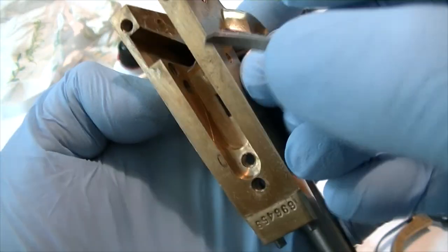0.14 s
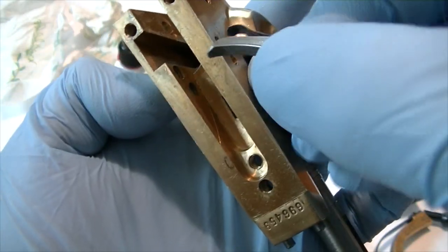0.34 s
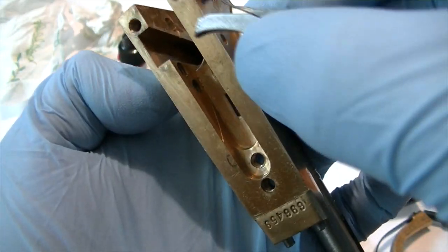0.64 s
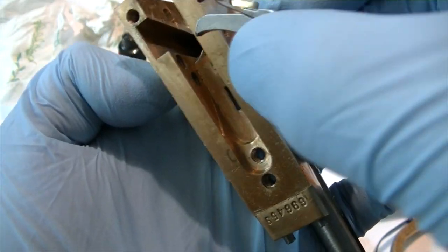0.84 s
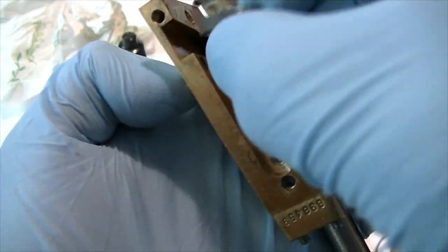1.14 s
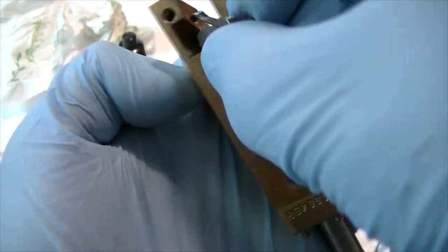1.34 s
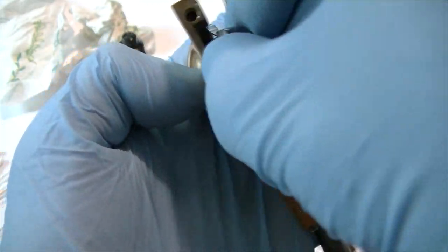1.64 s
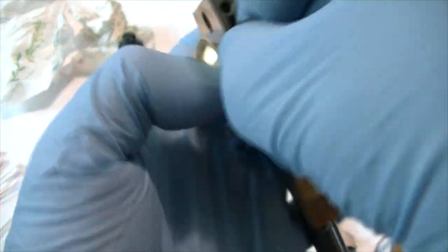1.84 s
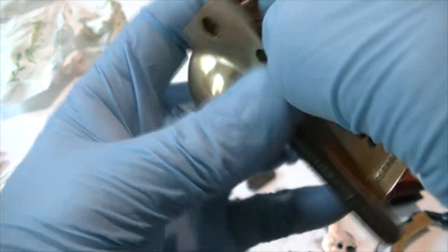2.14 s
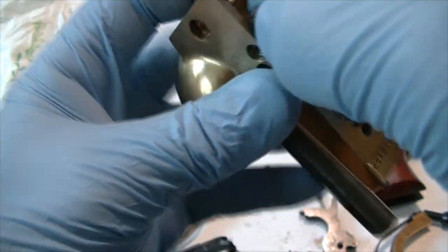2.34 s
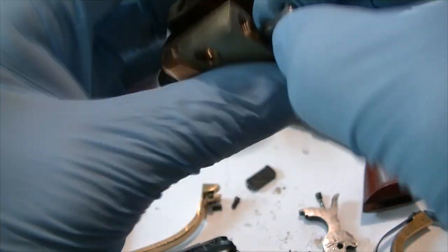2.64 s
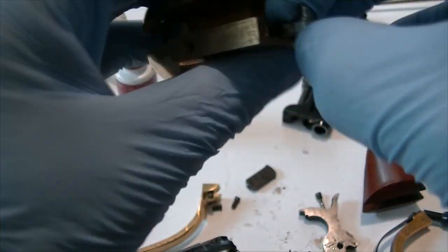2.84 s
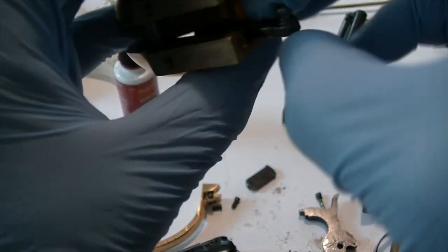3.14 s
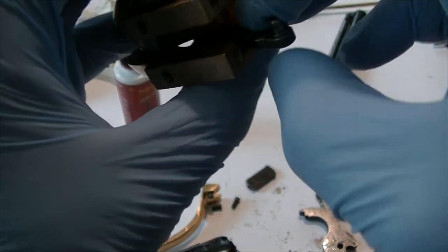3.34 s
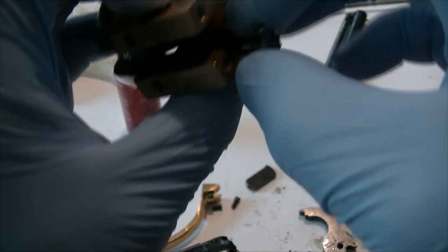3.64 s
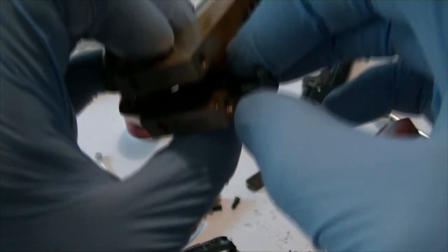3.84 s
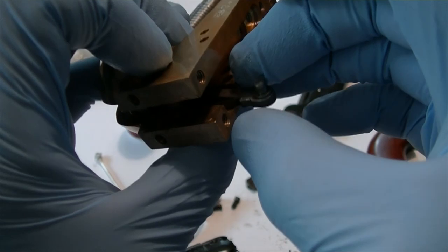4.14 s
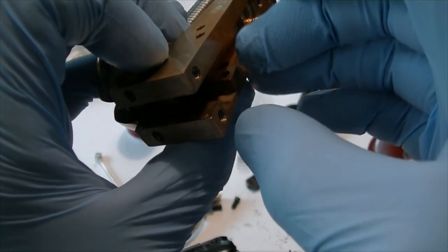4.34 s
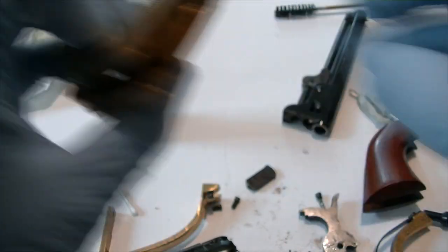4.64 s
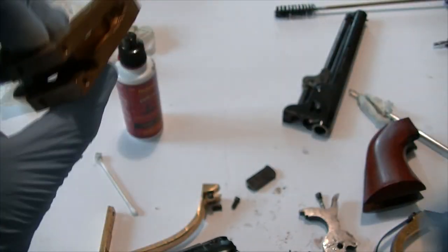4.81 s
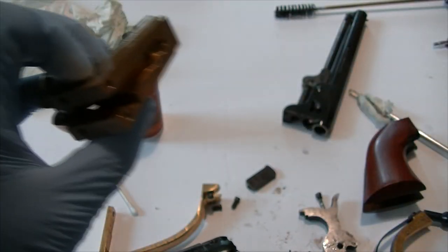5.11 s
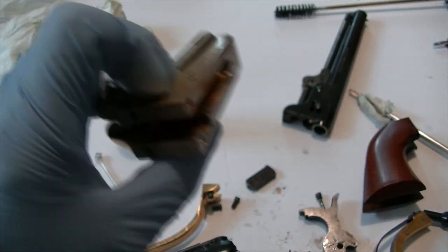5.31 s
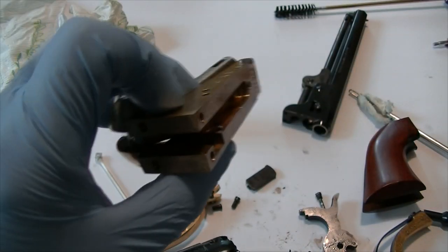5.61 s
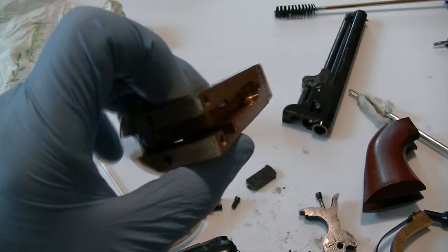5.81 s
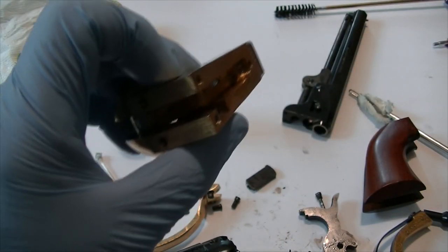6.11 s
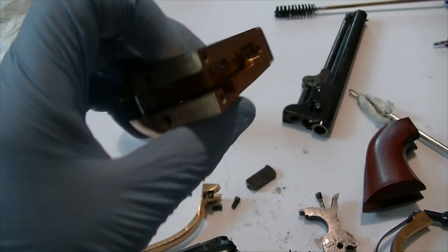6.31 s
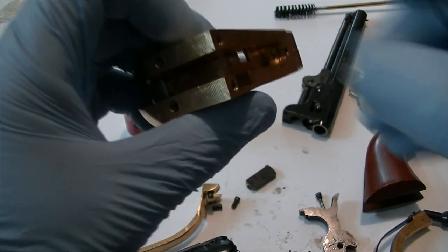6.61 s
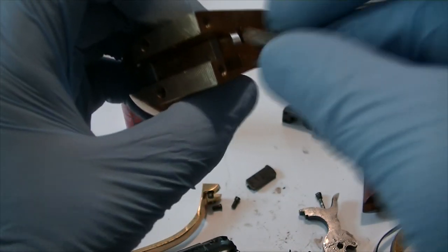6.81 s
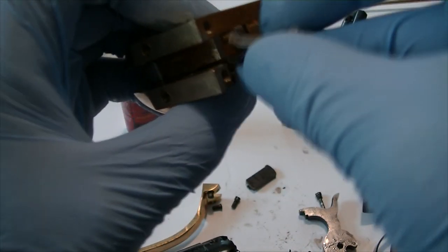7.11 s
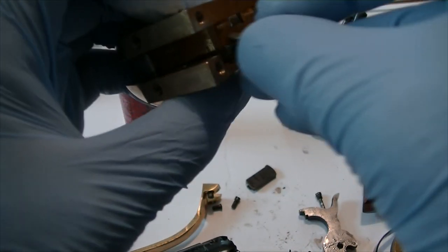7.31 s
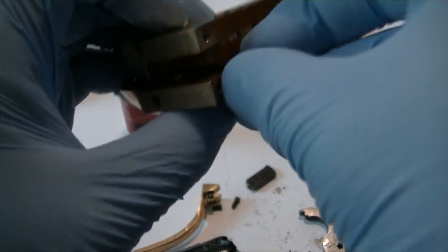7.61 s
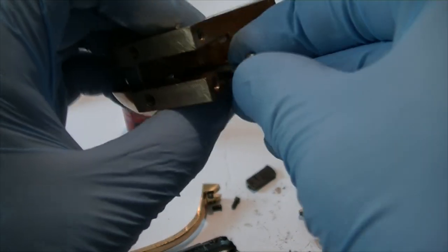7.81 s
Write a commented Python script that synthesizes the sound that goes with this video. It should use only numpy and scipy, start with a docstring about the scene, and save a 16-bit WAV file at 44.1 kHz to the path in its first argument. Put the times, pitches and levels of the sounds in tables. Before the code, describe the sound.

Small metal gun parts are handled right by the microphone: light clicks, short steel pings and scrapes mix with the hiss and creak of rubber gloves. Midway, a dropped tool hits the table with a loud crack, bounces a few times and settles, making the top resonate. More rubbing and ticking follows, ending in soft pings of a spring. A low fan hum fills the small room throughout.

```python
"""Fitting a spring in a revolver frame

A small room with a fan humming. Close to a stereo microphone, gloved hands turn a brass revolver
frame and try a flat steel spring in it. The rubber rubs and creaks, parts tick on the frame, and
the spring rings as it catches and scrapes. Further off, a dropped tool bounces on the table,
sets the top booming and rolls to rest."""
import sys
import numpy as np
from scipy import signal
from scipy.fft import rfft, irfft, next_fast_len
from scipy.io import wavfile

SR = 44100
rng = np.random.default_rng(int(sys.argv[2]) if len(sys.argv) > 2 else 0)


def inscribe(sig):
    """Save sig as 16-bit PCM at rate SR to the path in sys.argv[1].

    A 1-D sig is mono; a 2-D sig holds one channel per row.
    Samples are clipped to [-1, 1] before scaling.
    """
    pcm = np.round(np.clip(np.atleast_2d(sig).T, -1, 1) * 32767)
    wavfile.write(sys.argv[1], SR, pcm.astype(np.int16))


N = 351036


def undb(db):
    """Decibels to gain."""
    return 10 ** (np.asarray(db) / 20)


def unit(x):
    """Scale to rms 1."""
    return x / np.sqrt(np.mean(x ** 2))


def clock(seconds):
    """Sample times over a stretch."""
    return np.arange(int(seconds * SR)) / SR


def decay(t, t60):
    """Exponential fall of 60 dB in t60 seconds."""
    return np.exp(-np.log(1000) * t / t60)


def add(track, start_s, sound):
    """Mix a sound in at a time."""
    i = int(start_s * SR)
    track[i:i + len(sound)] += sound[:N - i]


def lookup(hz, points):
    """Read (freq_hz, value) points on a log-frequency axis."""
    f, value = np.transpose(points)
    return np.interp(np.log(hz + 1), np.log(f), value)


def shape(x, gain):
    """Filter by a gain given as a function of frequency."""
    size = next_fast_len(x.shape[-1], real=True)
    spectrum = rfft(x, size) * gain(np.fft.rfftfreq(size, 1 / SR))
    return irfft(spectrum, size)[..., :x.shape[-1]]


def colour(x, points):
    """Filter by (freq_hz, gain_db) points."""
    return shape(x, lambda f: undb(lookup(f, points)))


def band(x, hz, q):
    """One causal resonance, its q at least 0.7."""
    return signal.lfilter(*signal.iirpeak(min(hz, SR / 3), max(q, .7), fs=SR), x)


def blip(contact, hz, q):
    """A contact heard through one resonance, peak 1."""
    sound = band(contact, hz, q)
    return sound / np.abs(sound).max()


def click(points, tilt_db=0, size=512):
    """Minimum-phase pulse of peak 1 with a given spectrum, tilted about 2 kHz."""
    f = np.fft.rfftfreq(size, 1 / SR)
    spectrum_db = lookup(f, points) + tilt_db * np.log2((f + 200) / 2000)
    cepstrum = irfft(np.log(undb(spectrum_db)))
    cepstrum[1:size // 2] *= 2
    cepstrum[size // 2 + 1:] = 0
    pulse = irfft(np.exp(rfft(cepstrum)))
    return pulse / np.abs(pulse).max()


def ring(modes, tilt_db=0, pivot_hz=2000):
    """Decaying modes after one blow; a harder contact tilts them towards the treble."""
    t = clock(.5)
    return sum(undb(db + tilt_db * np.log2(hz / pivot_hz)) * np.sin(2 * np.pi * hz * t) * decay(t, t60)
               for hz, db, t60 in modes)


def chatter(t60, db):
    """A contact: one pulse, then a fast-dying burst of micro-impacts."""
    t = clock(.05)
    return (t == 0) + undb(db) * rng.standard_normal(len(t)) * decay(t, t60)


def walk(rate_hz):
    """Random wander of rms 1, changing about rate_hz times a second."""
    knots = rng.standard_normal(int(2 * rate_hz * N / SR) + 2)
    return unit(np.interp(np.arange(N) / SR * 2 * rate_hz, np.arange(len(knots)), knots))


def grit(rough_db, size=12):
    """Dense micro-slips whose strength changes every size samples."""
    noise = rng.standard_normal(N)
    strength = undb(rough_db * rng.standard_normal(N // size + 1))
    return unit(noise * np.repeat(strength, size)[:N])


def gesture(length_s, attack_share, release_s):
    """Envelope of one movement: attack, hold, exponential release."""
    t = clock(length_s + .3)
    attack = np.minimum(t / max(attack_share * length_s, 1 / SR), 1)
    return attack * np.exp(-np.maximum(t - length_s, 0) / release_s)


# Fan and mains tones in the background: pitch_hz, level_db
FAN_TONES = [(59, -74), (118.4, -66.5), (211, -66.5), (220.7, -60.5), (238, -67), (296.5, -61),
             (345.5, -56.5), (382.2, -63.5), (433, -64)]
# Air moving through the room: freq_hz, gain_db
AIR_COLOUR = [(25, -25), (58, -15), (90, -9), (120, -7.5), (160, -5), (215, 1), (330, -3), (440, -2.5),
              (540, -11), (800, -13), (1300, -18.5), (2100, -19.5), (3000, -24), (9000, -30),
              (16000, -38.5)]


def fan(air_db=-52, waver=0.31, drift_rad=0.76):
    """Wavering tones over moving air; deep bass and hiss differ between left and right."""
    t, tones = np.arange(N) / SR, np.zeros(N)
    for hz, db in FAN_TONES:
        amplitude = undb(db) * np.sqrt(2) * (1 + waver * walk(3.4))
        tones += amplitude * np.sin(2 * np.pi * hz * t + drift_rad * walk(2.75))
    mid, side = (undb(air_db) * unit(colour(rng.standard_normal(N), AIR_COLOUR)) for _ in range(2))
    side = colour(side, [(50, 2.5), (200, -9), (450, -6), (1500, 0.5), (4000, 0.5), (10000, -0.5)])
    return tones + mid + np.array([side, -side])


# A glove slides over the metal, close to the microphone: start_s, length_s, level_db, brightest_hz
GLOVE_SLIDES = [(0.013, 0.13, -64, 3500), (1.713, .42, -53.5, 1600), (1.831, 0.085, -52.5, 10000),
                (1.99, .12, -54, 8500), (2.176, 0.02, -44, 5500), (2.207, 0.04, -40.5, 5500),
                (2.274, .34, -50.5, 4500), (2.616, 0.17, -57.5, 3500), (2.831, 0.21, -55.5, 7000),
                (3.067, .1, -61.5, 3000), (3.374, .24, -64.5, 3000), (5.336, .07, -57.5, 4000),
                (5.416, 0.085, -43.5, 5000), (5.538, 0.014, -48.5, 5000), (5.552, .21, -55.5, 5500),
                (5.769, 0.078, -42, 5200), (5.937, 0.027, -44, 4200), (5.969, 0.031, -46.5, 4200),
                (6.0, 0.13, -61, 3500), (6.121, .012, -46, 6000), (6.381, .11, -58.5, 3000),
                (6.638, 0.19, -66.5, 10000), (7.073, .13, -57.5, 5000), (7.513, 0.088, -59.5, 2900),
                (7.597, 0.086, -57.5, 9500)]
# Hiss of rubber on metal at close range: freq_hz, gain_db
RUB_COLOUR = [(200, -4.5), (550, 0.5), (850, -1), (1300, 0.5), (2300, -2), (4200, 3), (6500, -3),
              (10000, -3), (13000, -10.5), (16000, -19)]


def glove_rub(grip_db=-66, swell_db=2, rub_db=-3.5, flutter_db=1.76,
              grain_db=-9, bright_db=-2.5, snap_db=-9, snaps_per_s=45):
    """Rubber sticks, snaps free and slips over the metal, each slide brightest in its own band."""
    speed = undb(grip_db + swell_db * walk(0.76))  # the grip never rests
    bright, slips = np.zeros(N), grit(rough_db=3.5)
    for start, length, db, hz in GLOVE_SLIDES:
        push = undb(db) * gesture(length, attack_share=0.32, release_s=0.023)
        add(speed, start, push)
        contact = slips[int(start * SR):][:len(push)]
        add(bright, start, push[:len(contact)] * unit(band(contact, hz, q=3)))
    hiss, side = (unit(colour(grit(rough_db=3.5), RUB_COLOUR)) for _ in range(2))
    grains = undb(grain_db) * unit(band(grit(rough_db=8.5, size=40), hz=2440, q=0.74))
    releases = (rng.random(N) < snaps_per_s / SR) * rng.standard_normal(N)
    snaps = signal.fftconvolve(releases, chatter(t60=0.01, db=-12))[:N]
    grains += undb(snap_db) * unit(band(snaps, hz=3000, q=.8))
    # both hands rub, so the treble differs between left and right
    side = colour(side, [(1000, -17), (3500, -16), (7000, -2), (12000, -4)])
    rub = speed * (hiss + grains + np.array([side, -side])) + undb(bright_db) * bright
    return undb(rub_db + flutter_db * walk(61)) * rub


# Parts and gloves catch on the frame, close up: start_s, level_db, centre_hz, relative_ring_db
FRAME_TICKS = [(.080, -37, 3420, -20), (0.1458, -27, 1980, -41), (.166, -30.5, 2810, -30),
               (0.3128, -34.5, 2630, -11.5), (.470, -27, 2270, -36), (.480, -45, 3000, -7),
               (1.074, -30, 3900, -25), (1.1642, -41.5, 2410, -11.5), (1.983, -34.5, 1780, -32),
               (2.190, -27, 5000, -28), (2.2357, -4.5, 5570, -45), (2.3277, -25, 6500, -25),
               (2.4414, -32.5, 760, -28), (2.4414, -23, 4470, -30), (2.467, -28.5, 3500, -21),
               (2.569, -23, 6500, -30), (3.019, -36.5, 2200, -33), (3.054, -33, 2480, -34),
               (3.102, -30, 10000, -29), (3.227, -34, 4000, -22), (3.933, -38, 2480, -10.5),
               (4.289, -27.5, 9500, -40), (5.101, -39.5, 2390, -13.5), (5.44, -21, 2900, -31),
               (5.978, -19, 3580, -39), (6.126, -28, 5560, -41), (6.486, -39.5, 2400, -9.5),
               (7.020, -43.5, 2400, -9.5)]
# Modes of the brass frame in the hand: pitch_hz, level_db, t60_s
FRAME_MODES = [(1970, -13, 0.041), (2360, -1, 0.05), (2880, -13, 0.036), (3580, 2, 0.035),
               (4660, -4.5, .03), (5200, -0.5, 0.025)]


def frame_ticks(q=1.55, thud_db=-27, spot_db=5):
    """Each catch ticks, thuds and rings the frame, which the gripping hand soon damps."""
    out = np.zeros(N)
    for start, db, hz, ring_db in FRAME_TICKS:
        # each spot on the frame favours other modes
        modes = [(f, mode_db + spot_db * rng.uniform(-1.1, 1), t60) for f, mode_db, t60 in FRAME_MODES]
        add(out, start, undb(db) * blip(chatter(t60=0.011, db=-18), hz, q))
        add(out, start, undb(db + thud_db) * ring([(300, 0, 0.018)]))
        add(out, start, undb(db + ring_db) * ring(modes))
    return colour(out, [(100, 0), (1000, 7.5), (4000, -0.5), (8000, 1), (16000, -2.5)])


# Close to the microphone, the steel spring clinks lightly (first two rows), then glove rubber lets go: start_s,
# level_db, centre_hz
CHIRPS = [(1.384, -44, 3470), (1.392, -42, 3450), (1.417, -44, 2600), (1.558, -45.5, 2900),
          (2.137, -37, 2780), (2.348, -33, 3350), (2.358, -34, 3210), (2.369, -33, 3400),
          (2.566, -32.5, 3020), (3.360, -43.5, 2500), (5.358, -43, 2960), (5.876, -40.5, 3100),
          (6.442, -42.5, 2200), (7.593, -43, 2930)]


def chirps(q=2.9, faint_db=-53, spread_db=3, faint_count=36):
    """Each release of the rubber, like the spring's light clink, is a short, soft-edged chirp; faint ones come
    at random."""
    out = np.zeros(N)
    faint = [(when * N / SR, faint_db + spread_db * (2 * size - 1), 2200 + 1200 * pitch)
             for when, size, pitch in rng.random((faint_count, 3))]
    for start, db, hz in CHIRPS + faint:
        release = band(chatter(t60=0.027, db=-12), hz, q)
        add(out, start, undb(db) * blip(release, hz, q))
    return out


# Modes of the flat steel spring between the fingers: pitch_hz, level_db, t60_s
SPRING_MODES = [(3143, -16, 0.086), (3520, -16.5, 0.081), (4343, -1, 0.07), (4417, -12.5, 0.047),
                (5000, -16, 0.054), (6560, -13.5, 0.048), (7100, -26, .08), (9760, -8.5, 0.025),
                (10400, -34, .08)]


def held_spring(tilt_db, damping, tune=1):
    """The steel rings; finger pressure damps and detunes it."""
    modes = [(hz * tune, db, t60 / damping) for hz, db, t60 in SPRING_MODES]
    return ring(modes, tilt_db, pivot_hz=4400)


# The spring catches, close up: start_s, level_db, tilt_db_per_octave, rise_ms, damping_factor
SPRING_PINGS = [(1.4294, -35.5, 11.5, 0.36, 0.56), (2.890, -34.5, 4.5, 1.7, 1.2),
                (3.408, -40.5, 1, 1.3, 1.7), (4.150, -37, -4, 1.3, 3.7), (4.173, -23, -7, 4.4, 1.13),
                (4.265, -37.5, 6, .4, 0.88), (7.197, -42.5, -9, 1.8, 0.77),
                (7.375, -35.5, -5.5, 0.44, 0.86), (7.612, -32, -13, 1.5, 1.5),
                (7.913, -32.5, -13, 1.5, 1.26)]
# It slides on the frame, as close: start_s, length_s, level_db, tilt_db_per_octave, damping_factor
SPRING_SCRAPES = [(1.626, 0.076, -60, 10, 2), (1.675, 0.1, -52.5, 8, 6), (2.048, 0.077, -50.5, 5, 5.2),
                  (2.383, 0.031, -42.5, -1, 2.5), (2.415, .018, -43.5, 0, 1.7), (4.14, 0.025, -53, -5, 1.9),
                  (4.205, 0.074, -59.5, 0, 3.7), (7.29, 0.068, -55.5, -2, 0.88),
                  (7.406, 0.064, -53.5, -2, 3.2), (7.604, 0.022, -45.5, 3, 5.4), (7.648, 0.11, -62, -6, 5),
                  (7.866, 0.059, -57, -1, 7.6)]


def spring(click_db=-5, bend=0.0098):
    """A catch clicks and strikes the steel modes; a slide drives them with friction."""
    out, friction = np.zeros(N), grit(rough_db=6)
    for start, db, tilt_db, rise_ms, damping in SPRING_PINGS:
        catch = undb(click_db) * band(chatter(t60=0.013, db=2), hz=4700, q=0.7)
        for sound in held_spring(tilt_db, damping), catch:
            build_up = 1 - np.exp(-np.arange(len(sound)) / (rise_ms * SR / 1000))
            add(out, start, undb(db) * sound * build_up)
    for start, length, db, tilt_db, damping in SPRING_SCRAPES:
        push = friction[int(start * SR):][:int(length * SR)]
        steel = held_spring(tilt_db, damping, tune=1 + bend * rng.uniform(-0.64, 0.54))
        scrape = signal.fftconvolve(push * signal.windows.tukey(len(push)), steel)
        add(out, start, undb(db) * scrape / scrape[:len(push)].std())
    return out


# Cupped hands shift near the microphone: start_s, length_s, level_db, centre_hz
PALM_MOVES = [(1.715, 0.42, -55, 488), (4.94, 0.093, -48.5, 163), (6.944, 0.52, -52, 457)]


def palm_rustle(q=3):
    """The cupped hands rustle hollowly, one rounded swell for each movement."""
    t, out, rustle = np.arange(N) / SR, np.zeros(N), rng.standard_normal(N)
    for start, length, db, hz in PALM_MOVES:
        progress = np.clip((t - start) / length, 0, 1)
        swell = np.sqrt(np.sin(np.pi * progress).clip(0))
        out += undb(db) * swell * unit(band(band(rustle, hz, q), hz, q))
    return out


# The tool hits the table, further off: start_s, level_db, tilt_db_per_octave, boom_db, spot_hz
TOOL_BOUNCES = [(4.4731, -2.5, -1, -17.5, 1760), (4.4857, -13, 5, -28, 2120),
                (4.658, -10.5, 0, -25.5, 3670), (4.6685, -7, -0.5, -27.5, 820),
                (4.7256, -31, -8.5, -48, 1150), (4.779, -21, 3.5, -41, 3490), (4.805, -8, 4.5, -49, 2270),
                (4.812, -22.5, -1.5, -46, 3500), (4.816, -24, 0, -41, 2200), (4.838, -32, 6, -45, 4540),
                (4.861, -31, 8, -39.5, 2000)]
# Crack of the hard contact: freq_hz, gain_db
CRACK_COLOUR = [(100, -20.5), (280, 2.5), (520, -9.5), (900, -0.5), (2000, 1), (2650, -1.5), (3500, 0),
                (5500, -13), (8500, -16.5), (12000, -27.5), (16000, -41)]
# Short rings of the tool: pitch_hz, level_db, t60_s
TOOL_MODES = [(740, -10.5, 0.0098), (953, -6, 0.011), (1257, -6.5, 0.013), (2015, -24, 0.0054),
              (3280, -9, 0.0092), (3560, -13.5, 0.017), (4420, -12.5, 0.0091), (7360, -17.5, 0.0038)]
# Modes of the table top under it: pitch_hz, level_db, t60_s
TABLE_MODES = [(176, -24, 0.12), (223.6, -14.5, 0.4), (258.7, -3.5, 0.22), (332, -17, 0.089),
               (394, -14, 0.1), (414, -13.5, 0.24), (653, -10, 0.24), (804, -10, 0.15), (1016, -15, 0.15),
               (1070, -16, 0.16), (1295, -18, 0.068), (1540, -23, 0.181), (1730, -29, .22),
               (2040, -34, 0.14), (2090, -32, 0.11), (3068, -30, .16), (3533, -28.5, 0.16)]


def dropped_tool(crack_db=-2, ring_db=-5, spot_db=-6, scatter=0.04, low_cut_hz=180):
    """Each bounce cracks, rings the tool and the struck spot, and booms in the table; a roll follows."""
    (out, boom), table = np.zeros((2, N)), ring(TABLE_MODES)
    for start, db, tilt_db, boom_db, spot_hz in TOOL_BOUNCES:
        crack = np.convolve(chatter(t60=0.013, db=-13.5), click(CRACK_COLOUR, tilt_db))
        # the tool lands another way up each time, which shifts its rings
        landed = [(hz * (1 + scatter * rng.uniform(-0.95, 1)), mode_db, t60)
                  for hz, mode_db, t60 in TOOL_MODES]
        add(out, start, undb(db + crack_db) * crack)
        add(out, start, undb(db + spot_db) * blip(click(CRACK_COLOUR), spot_hz, q=4))
        add(out, start, undb(db + ring_db) * ring(landed, tilt_db))
        add(boom, start, undb(boom_db) * table)
    out += tool_roll()
    heard = out + boom + room(out + undb(-10) * boom, wet_db=-11.5)
    # the small table top radiates no deep bass
    return signal.sosfilt(signal.butter(4, low_cut_hz, "high", fs=SR, output="sos"), heard)


# Rattle of the tool rolling where it fell: freq_hz, gain_db
ROLL_COLOUR = [(100, -11), (230, -8), (420, 8), (550, -12), (820, 6), (1200, -3), (3500, -10), (6000, -11),
               (9000, -16), (16000, -32)]


def tool_roll(start_s=4.805, length_s=0.084, level_db=-40.5):
    """Through its last bounces the tool rattles over the table and comes to rest."""
    push = np.zeros(N)
    add(push, start_s, gesture(length_s, attack_share=.1, release_s=0.034))
    return undb(level_db) * push * unit(colour(grit(rough_db=6, size=60), ROLL_COLOUR))


# Reverberation of the small room around the microphone: freq_hz, t60_s
ROOM_DECAY = [(150, 1), (600, 0.68), (3500, 0.53), (12000, 0.32)]


def room(x, wet_db, build_s=0.0031):
    """Diffuse echoes of a small room, alike left and right in the bass."""
    t = clock(.6)
    tail = np.zeros((2, len(t)))
    centres = np.geomspace(100, 14000, 8)
    for hz, share in zip(centres, np.eye(len(centres))):
        band_power = np.transpose([centres, share])
        noise = shape(rng.standard_normal(tail.shape), lambda f: np.sqrt(lookup(f, band_power)))
        tail += noise * decay(t, lookup(hz, ROOM_DECAY))
    tone = [(150, 4.5), (500, 1.5), (900, -1.5), (1800, -5.5), (3500, -1), (7000, -1), (14000, -2.5)]
    tail = colour(tail, tone) * (1 - np.exp(-t / build_s))
    mid, side = tail / np.sqrt(np.sum(tail[0] ** 2))
    side = colour(side, [(200, -15.5), (1000, -14), (3500, -11.5), (9000, 1)])
    response = np.array([mid + side, mid - side])
    return undb(wet_db) * signal.fftconvolve(x[None], response, axes=1)[:, :N]


def scene():
    """The hands are close and dry; the table is further off, with more of the room."""
    parts = frame_ticks() + chirps() + spring()
    rubbing = glove_rub() + palm_rustle()
    echoes = room(parts + rubbing.mean(axis=0), wet_db=-19)
    return parts + rubbing + echoes + dropped_tool() + fan()


# Balance at the microphone's two ports: freq_hz, left_minus_right_db
MIC_BALANCE = [(100, 0.5), (400, 1), (2400, 1), (4400, .5), (7000, 0.5), (9500, -3.5), (15000, -1.5)]


def record(dry, lead_s=.000013, top_hz=15950):
    """Two closely spaced ports: the right one is a little earlier and brighter; the top is cut."""
    left = shape(dry[0], lambda f: undb(lookup(f, MIC_BALANCE) / 2))
    right = shape(dry[1], lambda f: undb(-lookup(f, MIC_BALANCE) / 2) * np.exp(2j * np.pi * f * lead_s))
    low_pass = signal.ellip(10, .2, 80, top_hz, fs=SR, output="sos")
    return signal.sosfilt(low_pass, np.clip([left, right], -1, 1))


dry = scene()
out = record(dry)
inscribe(out)
```